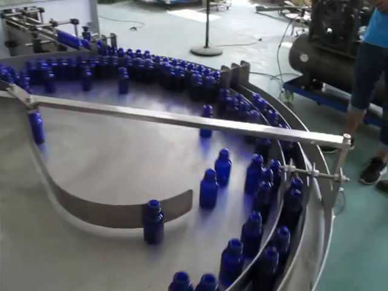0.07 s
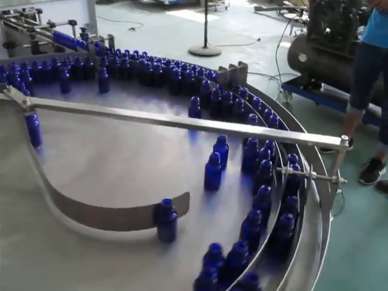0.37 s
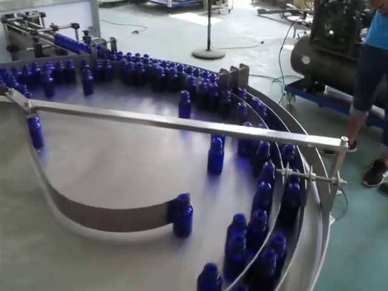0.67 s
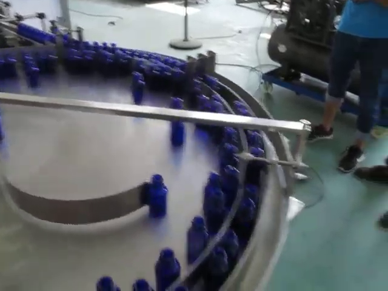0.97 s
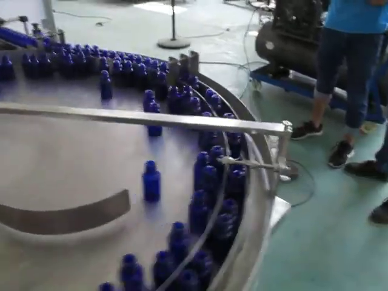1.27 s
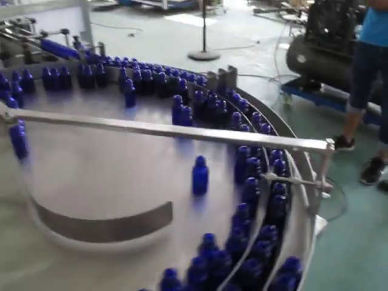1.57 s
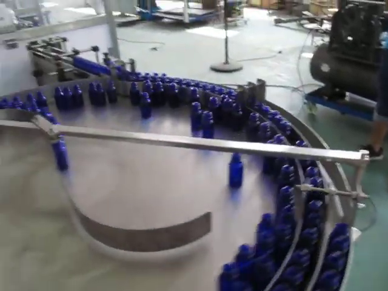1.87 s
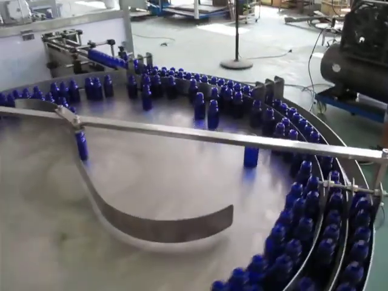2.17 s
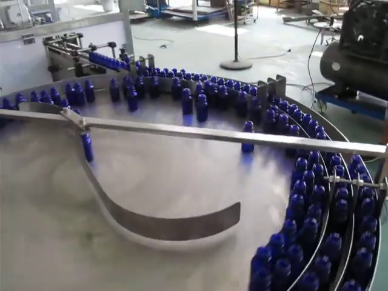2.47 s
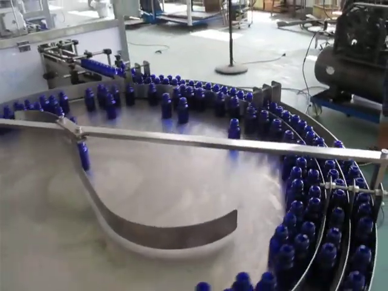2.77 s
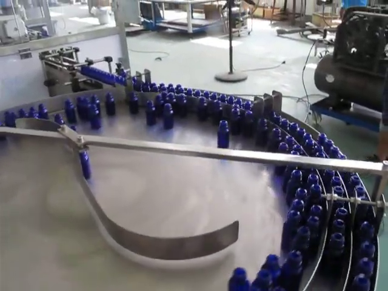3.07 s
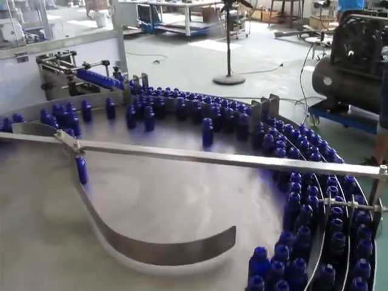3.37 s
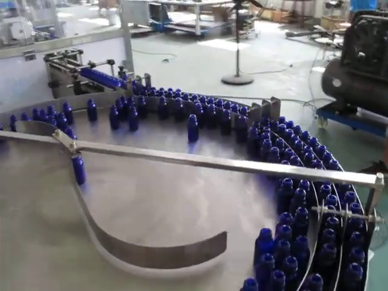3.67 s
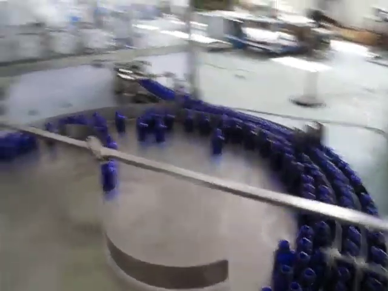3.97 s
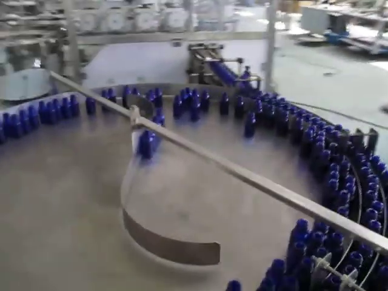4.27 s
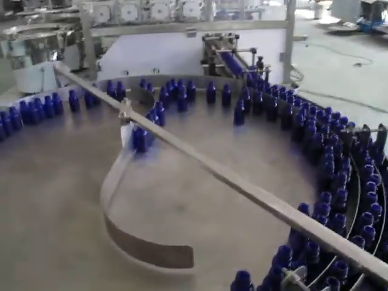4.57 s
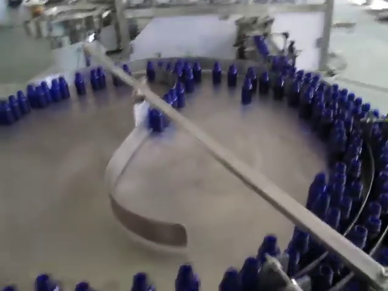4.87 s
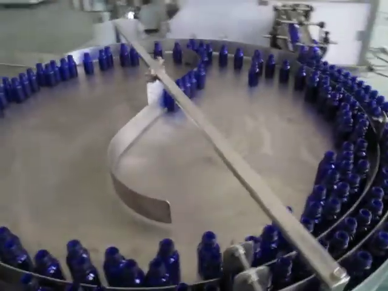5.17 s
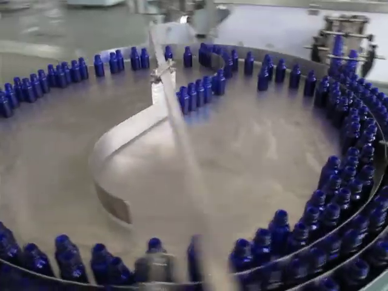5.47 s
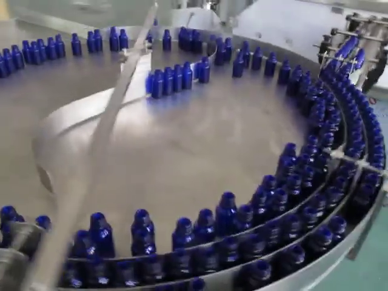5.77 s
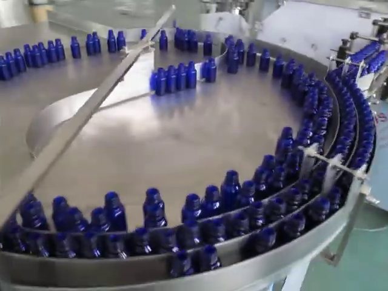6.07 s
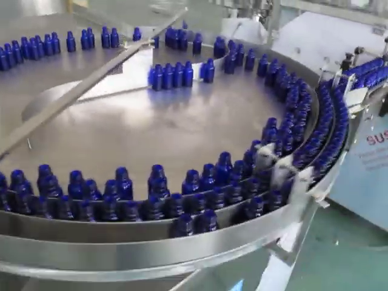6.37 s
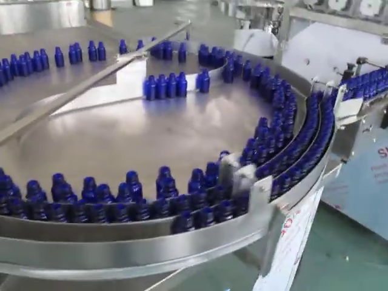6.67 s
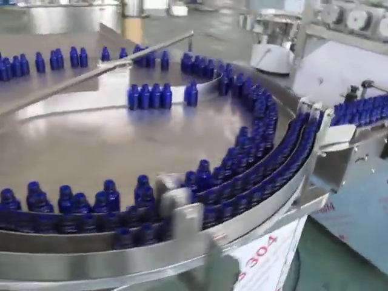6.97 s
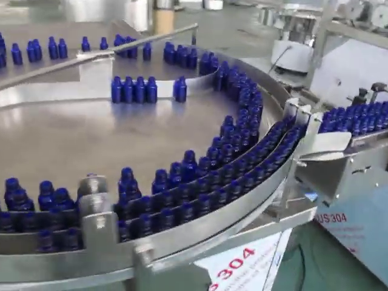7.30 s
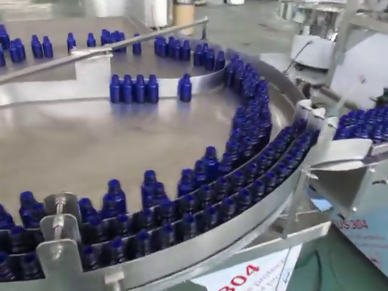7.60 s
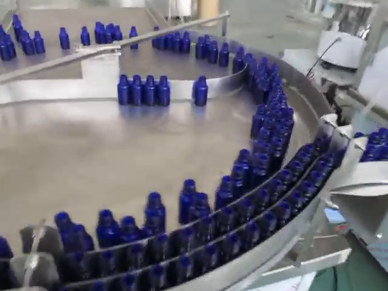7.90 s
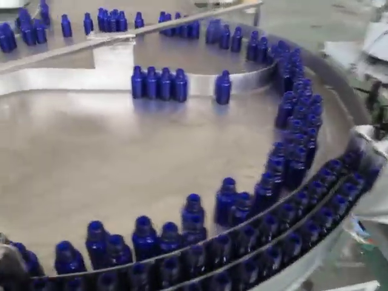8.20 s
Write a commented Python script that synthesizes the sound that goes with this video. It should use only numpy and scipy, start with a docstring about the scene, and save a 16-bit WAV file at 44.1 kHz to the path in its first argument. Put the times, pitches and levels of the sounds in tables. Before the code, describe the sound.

Glass bottles jostle and chatter throughout on a steel turntable, over the steady roar of a factory hall and the soft hum of drives. For the first four seconds, close clinks and knocks come thick and fast, each ringing briefly with a short echo, mixed with a few gritty scrapes and high pings. Glass rubbing on the guides hisses from the start until about 2 seconds, and again briefly near 2.5. From 4 to 6 seconds a brighter hiss with faint sinking squeals takes over, the close clinks thin out, and a motor whine rises a little. Sharp knocks, clinks and scrapes return from about 6 to 7.3 seconds. Another bright hiss with faint squeals runs from 7 to just past 8 seconds. At about 8.3 seconds a last clink sounds and bottles set a steel guide rail buzzing.

```python
"""Glass bottles clink, knock and hiss along a filling line, over the hum and roar of a factory hall.
Each bump makes the glass ring briefly; further bottles also shake a steel turntable, and at the end
a guide rail buzzes. When the queue presses on the guides, the rubbing glass gives spells of bright
hiss and faint squeals that sink in pitch as the queue grows. Drives hum behind it all,
and the hall echoes the hits."""
import sys
import numpy as np
from scipy import signal
from scipy.fft import rfft, irfft, next_fast_len
from scipy.io import wavfile
from scipy.ndimage import uniform_filter1d

SR = 44100
rng = np.random.default_rng(int(sys.argv[2]) if len(sys.argv) > 2 else 0)


def unload_audio(sound):
    """Save the sound as a 16-bit wav file, at the path given as the first command line argument."""
    columns = np.transpose(np.atleast_2d(sound))
    # keep every value between -1 and 1, then stretch to whole-number steps
    steps = np.round(np.clip(columns, -1, 1) * 32767)
    wavfile.write(sys.argv[1], SR, steps.astype(np.int16))


N = 372204
TIME = np.arange(N) / SR

# tone colour of a hard clack of glass on glass: f/Hz, level/dB
CLACK_SPECTRUM = [(200, -55), (900, -21), (1900, -12), (2700, -1.5), (4200, -2), (6500, -5.5), (9000, -14),
                  (16000, -40)]
# tone colour of a thin, bright clink: f/Hz, level/dB
CLINK_SPECTRUM = [(1000, -58), (3500, -15), (5500, 0), (7500, 7), (9800, 10.5), (16000, -10)]


def amp(db):
    """Turns decibels into a factor to multiply a sound by."""
    return 10 ** (np.asarray(db) / 20)


def unit(x):
    """Scales a signal to an average power of 1."""
    return x / np.sqrt(np.mean(x ** 2) + 1e-20)


def at_hz(points, hz):
    """Reads a spectrum's level between its points, with every octave equally wide."""
    f, db = np.transpose(points)
    return np.interp(np.log(hz + 1), np.log(f + 1), db)


def level_curve(points):
    """Joins (time, level) points with straight lines, giving a level for every sample."""
    times, db = np.transpose(points)
    return np.interp(TIME, times, db)


def colour(x, points):
    """Makes each frequency of a sound louder or softer, as the given spectrum says."""
    hz = np.fft.rfftfreq(len(x), 1 / SR)
    return irfft(rfft(x) * amp(at_hz(points, hz)), len(x))


def drift(size, rate_hz, per_s=SR):
    """A smooth random wobble of power 1; a higher rate makes it move faster."""
    padded = next_fast_len(size)
    f = np.fft.rfftfreq(padded, 1 / per_s)
    keep_slow = np.exp(-(f / rate_hz) ** 2) * (f > 0)
    return unit(irfft(rfft(rng.standard_normal(padded)) * keep_slow, padded)[:size])


def rough_tone(phase, width_hz):
    """A narrow band of noise around a tone: the wider, the more it hisses."""
    sine_part = drift(len(phase), width_hz) * np.sin(phase)
    cosine_part = drift(len(phase), width_hz) * np.cos(phase)
    return unit(sine_part + cosine_part)


def add(mix, s, sound):
    """Adds a sound at s seconds, cut to fit the mix."""
    start = round(s * SR)
    sound = sound[max(-start, 0):]
    part = mix[max(start, 0):][:len(sound)]
    part += sound[:len(part)]


def shaped_noise(spectrum_db, size=4096):
    """Noise of steady power whose tone colour follows spectrum_db(hz, t)."""
    frames = dict(fs=SR, nperseg=size, noverlap=size * 3 // 4)
    hz, t, noise = signal.stft(rng.standard_normal(N), **frames)
    gain = amp(spectrum_db(hz, t))
    gain = gain / np.sqrt(np.mean(gain ** 2, axis=0))
    return signal.istft(noise * gain, **frames)[1][:N]


def ripple(hz, t, sink, width_hz, change_hz):
    """Random peaks in a spectrum that come and go, losing the share `sink` of their pitch a second."""
    grid_hz = np.arange(0, SR, 5.)
    place = hz[:, None] * np.exp(sink * (t - t.mean()))
    weights = np.array([drift(len(t), change_hz, 1 / t[1]) for _ in range(4)])
    weights = weights / np.linalg.norm(weights, axis=0)
    patterns = [drift(len(grid_hz), 1 / width_hz, 1 / grid_hz[1]) for _ in weights]
    return sum(w * np.interp(place, grid_hz, pattern) for w, pattern in zip(weights, patterns))


def ring(points, t60, peaks_db, spacing_hz=170, size=8192):
    """A struck object rings with many random tones, all fading by 60 dB in t60 seconds."""
    t, hz = np.arange(size) / SR, np.fft.rfftfreq(size, 1 / SR)
    strengths = amp(at_hz(points, hz) + peaks_db * drift(len(hz), 1 / spacing_hz, 1 / hz[1]))
    tones = irfft(strengths * np.exp(2j * np.pi * rng.random(len(hz))), size)
    decay = amp(-60 * t / t60)
    # the glass touches several times before it parts
    chatter = amp(2.0 * drift(size, 600)) * (1 - np.exp(-t / .0002))
    sound = tones * chatter * decay
    return sound * np.linalg.norm(decay) / np.linalg.norm(sound)


def random_taps(per_s, spread_db):
    """Single pushes at random moments, most of them light and a few harder."""
    strength = amp(spread_db * np.minimum(rng.exponential(1, N), 2))
    return strength * (rng.random(N) < per_s / SR)


def hall_roar():
    """Distant machines roar; standing waves in the room lift some pitches and weaken others."""
    # tone colour of the machines: f/Hz, level/dB
    machine_spectrum = [(20, -43), (55, -30), (82, -28), (150, -19), (200, -12.5), (250, -13), (300, -10.5),
                        (560, -2.5), (750, -2.5), (1900, -1), (2450, 0.5), (3300, -2), (6000, -4),
                        (10000, -7.5), (16000, -11.5)]
    # loudness of the roar: t/s, level/dB
    roar_levels = [(0, -31), (.6, -28.5), (2.4, -30), (4.3, -30), (5.6, -29), (6.4, -30), (8.44, -28.5)]

    def spectrum_db(hz, t):
        standing_waves = 2.0 * ripple(hz, t, sink=0, width_hz=50, change_hz=1.2)
        return at_hz(machine_spectrum, hz)[:, None] + standing_waves
    return amp(level_curve(roar_levels) + 0.98 * drift(N, 20)) * shaped_noise(spectrum_db)


def hall_echo(x, t60=0.42):
    """The hall throws a sound back as a smooth, fading wash."""
    t = np.arange(SR // 2) / SR
    tail = rng.standard_normal(len(t)) * amp(-60 * t / t60) * (t > .006)
    return signal.fftconvolve(x, tail / np.linalg.norm(tail))[:N]


def whine(hz, overtones):
    """A turning part sounds at multiples of one wavering pitch, each blurred by the hall."""
    phase = 2 * np.pi * np.cumsum(hz * (1 + 0.0012 * drift(N, 6.1))) / SR
    return unit(sum(amp(db) * (np.sin(k * phase) + .7 * rough_tone(k * phase, 14))
                    for k, db in overtones))


def drives(gear_hz=294.4, motor_hz=148.8, conveyor_hz=562.6):
    """A gear and a motor whine, and the conveyor hums with a little rumble of its frame."""
    # tones of the gear and of the motor: multiple of the base pitch, level/dB
    gear_tones = [(1, -10.5), (2, -1.5), (4, 0), (5, 1.5)]
    motor_tones = [(4, -2), (6, 2.5), (7, -6), (8, -7), (14, 3.5)]
    # loudness of the gear, the motor and the conveyor: t/s, level/dB
    gear_levels = [(0, -50), (2.4, -44), (3.3, -41), (4.2, -45.5)]
    motor_levels = [(3.6, -63), (4.1, -42), (4.9, -55), (5.45, -39), (5.8, -36), (6.1, -48), (6.4, -68)]
    conveyor_levels = [(0, -61), (1.8, -51), (3.7, -50.5), (4.3, -54), (5.4, -44), (5.9, -42.5),
                       (6.35, -49), (7.8, -45.5), (8.44, -49)]
    phase = 2 * np.pi * np.cumsum(conveyor_hz * (1 + 0.002 * drift(N, 7.0))) / SR
    hum = unit(np.sin(phase) * amp(2.5 * drift(N, 3.2)))
    rumble = amp(-7) * rough_tone(phase, width_hz=30)
    gear = amp(level_curve(gear_levels)) * whine(gear_hz, gear_tones)
    motor = amp(level_curve(motor_levels)) * whine(motor_hz, motor_tones)
    return gear + motor + amp(level_curve(conveyor_levels)) * (hum + rumble)


def jostling(taps_per_s=75, pairs=36, turntable_db=-14.5):
    """Further bottles tap each other; each pair has its own ring and shakes its spot of the turntable."""
    # tone colour of the steel turntable: f/Hz, level/dB
    turntable_spectrum = [(70, -36), (170, -9.5), (380, -2), (700, 5.5), (1500, -4.5), (3000, -26)]
    # how hard the bottles jostle: t/s, relative level/dB
    jostle_levels = [(0, -31), (.95, -33), (2.6, -31.5), (3.2, -40.5), (3.7, -35.5), (6.2, -34.5),
                     (8.44, -40.5)]
    glass, steel = np.zeros(N), np.zeros(N)
    for _ in range(pairs):
        t60 = rng.uniform(0.026, 0.11)
        clack = ring(CLACK_SPECTRUM, t60, peaks_db=5) * rng.uniform(0.37, 1)
        clink = ring(CLINK_SPECTRUM, 2 * t60, peaks_db=5) * rng.uniform(0.27, 0.7)
        taps = random_taps(taps_per_s / pairs, spread_db=3.5)
        thud = ring(turntable_spectrum, t60=0.25, peaks_db=6, spacing_hz=38.4)
        glass += signal.oaconvolve(taps, clack + clink)[:N]
        steel += signal.oaconvolve(taps, thud)[:N]
    return amp(level_curve(jostle_levels) + 2.5) * (unit(glass) + amp(turntable_db) * unit(steel))


def rattling(taps_per_tone_per_s=110, t60=0.039):
    """Packed bottles chatter: countless tiny touches all ring the same few tones."""
    # the tones they ring with: f/Hz, level/dB
    glass_tones = [(2230, -6), (2410, -1), (2570, -3), (2730, -4), (2900, -4.5)]
    # loudness of the chatter: t/s, level/dB
    rattle_levels = [(0, -37), (1.3, -38.5), (2.4, -34), (3.3, -38), (4.1, -36.5), (8.44, -39)]
    t, out = np.arange(SR // 10) / SR, np.zeros(N)
    for hz, db in glass_tones:
        taps = random_taps(taps_per_tone_per_s, spread_db=4) * rng.choice([-1, 1], N)
        tone = amp(db - 60 * t / t60) * np.sin(2 * np.pi * hz * t)
        out += signal.oaconvolve(taps, tone)[:N]
    return amp(level_curve(rattle_levels)) * unit(out)


def squeals(width_at_1khz=15):
    """Glass rubbing on the guides sings one sinking note: a rough whine if low, a thin hiss if high."""
    # the squeals: start/s, end/s, middle f/Hz, level/dB, share of the pitch lost each second
    notes = [(0, 1.15, 960, -41, 0.016), (0.052, 0.88, 1118, -51, 0.022), (0.249, .8, 1421, -40, 0.025),
             (0.953, 1.45, 1300, -43, 0.028), (0.503, 1.45, 680, -47, 0.0197), (1.451, 1.97, 965, -42, .02),
             (1.45, 2, 1144, -44, 0.041), (1.53, 1.663, 2110, -36, .02), (1.33, 1.8, 8850, -36, .04),
             (4.05, 4.35, 1795, -39, 0.02), (3.954, 4.6, 2600, -37.5, 0.059),
             (4.004, 5.2, 8530, -36, 0.023), (4.473, 4.76, 1960, -38, .11), (3.95, 5.3, 5220, -40, 0.094),
             (5.1, 6.05, 4800, -39.5, .025), (5.04, 5.657, 1515, -37.5, 0.0253),
             (5.3, 6.0, 9860, -41, 0.0053), (5.67, 5.85, 2097, -37, 0.022), (6.9, 8.1, 9700, -33, .035),
             (7.15, 7.5, 1040, -45, 0.018), (7.2, 8.5, 4900, -43, .06), (7.45, 8.204, 810, -42.5, .089),
             (7.55, 8.157, 485, -47, 0.075), (7.8, 8.322, 1900, -40.5, .021)]
    out = np.zeros(N)
    for start, end, hz, db, sink in notes:
        t = np.arange(0, end - start, 1 / SR)
        phase = 2 * np.pi * np.cumsum(hz * (1 - sink * (t - t.mean()))) / SR
        width_hz = width_at_1khz * (hz / 1000) ** 1.2
        fade = signal.windows.tukey(len(t), .6)
        add(out, start, amp(db) * rough_tone(phase, width_hz) * fade)
    return out


def queue_pressure(t, release_s=0.59, dulling_db_per_octave=5):
    """Gives the hiss's level and brightness: both rise as the queue presses and fall as it lets go."""
    # spells of pressing: full from/s, until/s, build-up/s, level/dB, brightness/(dB per octave)
    spells = [(0, 1.74, .3, -24.5, 1.6), (2.2, 2.57, 0.47, -27.5, 1.7), (4.0, 5.72, 0.27, -23, 3.5),
              (7.08, 8.15, 0.58, -23, 5)]
    pressure = np.array([np.minimum(1 + (t - start) / rise_s, 1 - (t - end) / release_s)
                         for start, end, rise_s, _, _ in spells]).clip(0, 1)
    *_, db, brightness = np.transpose(spells)
    gain = pressure * amp(db)[:, None]
    level_db = 20 * np.log10(gain.max(0) + 1e-4)  # the strongest spell leads
    dulling = dulling_db_per_octave * (1 - pressure.max(0))
    return level_db, brightness[gain.argmax(0)] - dulling


def sliding():
    """Many bottles rub on steel with a grainy hiss, whose peaks sink in pitch as the queue grows."""
    # tone colour of sliding glass: f/Hz, level/dB
    hiss_spectrum = [(100, -57), (300, -11), (520, -9), (1000, -8.5), (1550, -5.5), (2000, 2), (2600, -3),
                     (3600, -7), (4600, -7.5), (7000, -2), (8600, -1), (9900, 0.5), (16000, -9.5)]

    def spectrum_db(hz, t):
        _, brightness = queue_pressure(t)
        tilt = brightness * np.log2(hz[:, None] / 5000 + 0.064)
        depth_db = at_hz([(2000, 4), (6000, 3.1)], hz)[:, None]
        narrow_peaks = depth_db * ripple(hz, t, sink=.02, width_hz=45, change_hz=2.2)
        broad_peaks = 1.1 * ripple(hz, t, sink=.04, width_hz=240, change_hz=.9)
        return at_hz(hiss_spectrum, hz)[:, None] + tilt + narrow_peaks + broad_peaks
    level_db, _ = queue_pressure(TIME)
    grain_db = drift(N, 280) + .5 * drift(N, 25)
    return amp(level_db + grain_db) * shaped_noise(spectrum_db)


def rail_buzz(t60=0.36, width_hz=22):
    """Bottles run into a steel guide rail, which buzzes on."""
    # tones of the rail: f/Hz, level/dB
    rail_tones = [(2660, -1), (4000, 1), (4830, 1), (5170, -2), (5980, 0), (6450, 4), (8260, 2), (9990, 7)]
    # blows on the rail: t/s, level/dB
    blows = [(8.346, -27), (8.388, -24.5), (8.419, -23.5)]
    t, out = np.arange(SR // 2) / SR, np.zeros(N)
    for s, blow_db in blows:
        buzz = unit(sum(amp(db) * rough_tone(2 * np.pi * hz * t, width_hz) for hz, db in rail_tones))
        add(out, s, amp(blow_db - 60 * t / t60) * buzz)
    return out


def scrapes(grit_db=3.0, rise_s=0.0055):
    """A near bottle is dragged past its neighbours in a short gritty burst."""
    # the scrapes: t/s, length/s, bright level/dB, dull level/dB
    bursts = [(0.819, 0.074, -31, -26), (1.376, .05, -24.5, -27), (1.836, 0.051, -23, -23),
              (3.519, 0.089, -26, -31), (3.713, 0.063, -27, -33), (6.159, 0.074, -26, -27),
              (6.904, .05, -29, -32), (7.002, 0.032, -33.5, -31), (7.042, 0.11, -25.5, -29)]
    out = np.zeros(N)
    for s, length, bright_db, dull_db in bursts:
        size = round(length * SR)
        t = np.arange(size) / SR
        bright = amp(bright_db) * unit(colour(rng.standard_normal(size), CLINK_SPECTRUM))
        dull = amp(dull_db) * unit(colour(rng.standard_normal(size), CLACK_SPECTRUM))
        swell = np.minimum(np.minimum(t / rise_s, 1), 2 * (1 - t / length))
        grit = unit(amp(grit_db * drift(size, 370)))
        add(out, s, (bright + dull) * swell * grit)
    return out


def pings(t60=0.12):
    """A bottle springs clear of its neighbours and rings on with one high tone."""
    # the pings: t/s, level/dB, f/Hz
    notes = [(.23, -26, 4100), (1.233, -23, 4220), (3.543, -23, 6230), (3.984, -21.5, 4850)]
    t, out = np.arange(SR // 2) / SR, np.zeros(N)
    for s, db, hz in notes:
        add(out, s, amp(db - 60 * t / t60) * np.sin(2 * np.pi * hz * t))
    return out


def knocks(contact_t60=0.018, clink_db=-11, ring_db=-3.5, low_cut_hz=560):
    """A short hard knock sets all the tones of one free bottle ringing at once."""
    # the knocks: t/s, level/dB, f/Hz
    hits = [(0.618, -20, 2590), (0.646, -17.5, 2550), (.657, -20, 2620), (1.001, -12.5, 2890),
            (1.16, -17, 3960), (1.233, -18.5, 4100), (1.512, -17, 2570), (1.714, -17, 2140),
            (1.832, -19, 2410), (2.423, -16.5, 3700), (2.9455, -17, 4580), (2.955, -19, 4580),
            (2.96, -20, 4000), (3.003, -19.5, 3540), (3.272, -19, 4960), (3.6087, -21, 2720),
            (5.952, -13, 2350), (5.9913, -16, 2560), (6.2421, -12, 3250), (6.3165, -17, 3450),
            (6.39, -16, 2790), (6.58, -20.5, 3400), (6.591, -21, 2600), (6.6052, -18.5, 3570),
            (7.046, -19.5, 2410)]
    # tones of a bottle: multiple of its pitch, level/dB, ring time/s
    bottle_tones = [(1, -1.5, 0.049), (1.08, -6.5, 0.024), (1.29, -5.5, .036), (2.02, -5, 0.008)]
    t, out = np.arange(SR // 8) / SR, np.zeros(N)
    for s, db, hz in hits:
        clack = ring(CLACK_SPECTRUM, contact_t60, peaks_db=4.5)
        clink = ring(CLINK_SPECTRUM, contact_t60, peaks_db=4.5)
        ringing = sum(amp(tone_db - 60 * t / t60) * np.sin(2 * np.pi * ratio * hz * t)
                      for ratio, tone_db, t60 in bottle_tones)
        add(out, s, amp(db) * (clack + amp(clink_db) * clink))
        add(out, s, amp(db + ring_db) * ringing)
    low_cut = signal.butter(2, low_cut_hz, "high", fs=SR, output="sos")  # the knocks carry no deep bass
    return signal.sosfilt(low_cut, out)


def clatters(t60=0.12, spread_s=0.0013):
    """A bump runs through a group of near bottles: a bright clink over the dull knock of their bodies."""
    # the bumps: t/s, clink level/dB, body level/dB
    bumps = [(0.084, -21, -20), (0.268, -20, -29.5), (0.424, -15, -20.5), (0.733, -13, -19.5),
             (0.882, -15, -16.5), (1.0668, -13, -18.5), (1.144, -25, -20.5), (1.186, -15, -25),
             (1.365, -21, -19.5), (1.709, -20, -18), (1.8213, -24, -21), (1.872, -14.5, -23),
             (2.051, -16, -19), (2.086, -20, -22), (2.222, -15, -28.5), (2.252, -18, -18.5),
             (2.3666, -16.5, -18.5), (2.533, -13, -18.5), (2.663, -18, -20), (2.73, -19.5, -18.5),
             (2.763, -24, -27), (2.794, -21, -25), (2.829, -23, -26), (2.868, -33, -24),
             (2.976, -20.5, -28), (3.097, -23.5, -26), (3.249, -26, -24), (3.268, -24, -23),
             (3.54, -24, -31), (3.695, -16, -26), (3.804, -22, -25), (3.913, -15, -20),
             (5.2667, -15.5, -25), (5.646, -13, -22.5), (5.933, -18.5, -20.5), (5.992, -20, -23),
             (6.1446, -19, -23), (6.1581, -16, -21), (6.4044, -19.5, -34), (6.419, -20, -27),
             (6.616, -16.5, -36), (6.784, -19.5, -22), (6.9703, -21, -26), (7.098, -19, -22.5),
             (7.27, -17.5, -30), (8.345, -19.5, -20.5)]
    # tone colour of the bottle bodies: f/Hz, level/dB
    body_spectrum = [(200, -45), (900, -24.5), (2000, -8), (3100, -4.5), (4500, -7), (6000, -7),
                     (9000, -19), (16000, -44)]
    out = np.zeros(N)
    for s, clink_db, body_db in bumps:
        clink = amp(clink_db) * ring(CLINK_SPECTRUM, t60, peaks_db=4.8)
        body = amp(body_db) * ring(body_spectrum, t60, peaks_db=4.8)
        t = np.arange(len(body)) / SR
        onset = 1 - np.exp(-t / spread_s)  # the bump takes a moment to reach the neighbours
        add(out, s, (clink + body) * onset)
    return out


def scene():
    """Adds up all the sources, alike on both channels."""
    hits = clatters() + scrapes() + pings() + jostling() + rail_buzz() + knocks()
    echo = amp(-8.5) * hall_echo(hits)
    mono = hits + echo + rattling() + sliding() + squeals() + hall_roar() + drives()
    return np.array([mono, mono])


def record(dry, threshold_db=-20.5, squeeze=0.81, recover_db_per_s=140, attack_s=0.0023, top_hz=15900):
    """Mutes the top treble; a quick volume control lets the first crack through, then turns down."""
    # overall tone colour, with a deep dip near 11.8 kHz and muted treble above it: f/Hz, level/dB
    overall_spectrum = [(10000, 1), (10500, -2.5), (11000, -5.5), (11450, -14), (11760, -28), (12050, -19),
                        (12800, -11.5), (15700, -16)]
    heard = np.array([colour(channel, overall_spectrum) for channel in dry])
    power = uniform_filter1d(heard[0] ** 2, size=200, origin=99)
    power_db = 10 * np.log10(abs(power) + 1e-12)
    fall_db = TIME * recover_db_per_s
    peak_db = np.maximum.accumulate(power_db + fall_db) - fall_db  # jumps up at a peak, then sinks
    excess_db = np.maximum(peak_db - threshold_db, 0)
    lag = np.exp(-1 / (attack_s * SR))
    cut_db = squeeze * signal.lfilter([1 - lag], [1, -lag], excess_db)
    treble_cut = signal.firwin(511, top_hz, window=("kaiser", 9), fs=SR)
    return signal.oaconvolve(heard / amp(cut_db), treble_cut[None], "same")


dry = scene()
out = record(dry)
unload_audio(out)
```